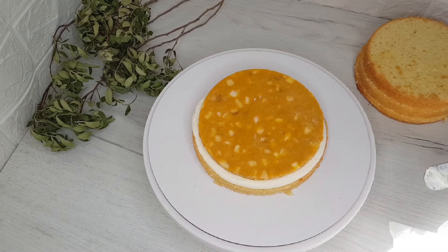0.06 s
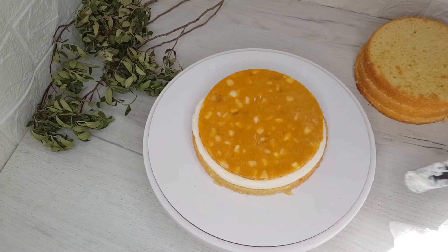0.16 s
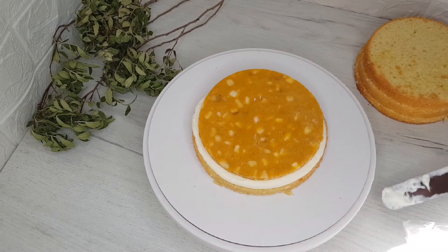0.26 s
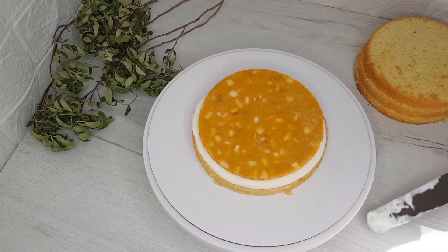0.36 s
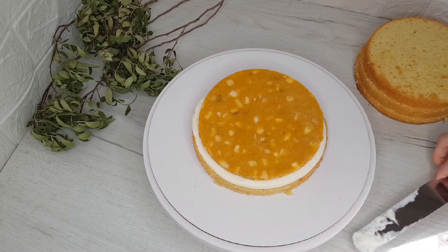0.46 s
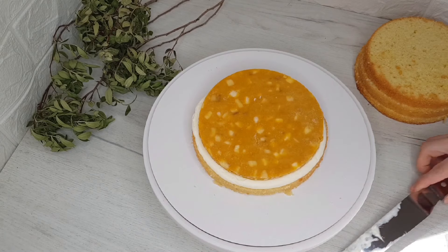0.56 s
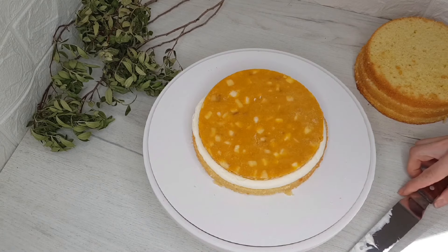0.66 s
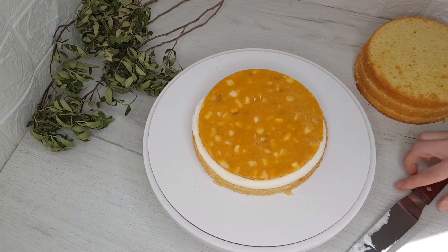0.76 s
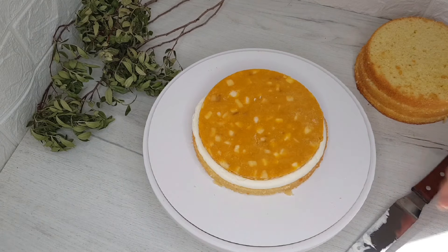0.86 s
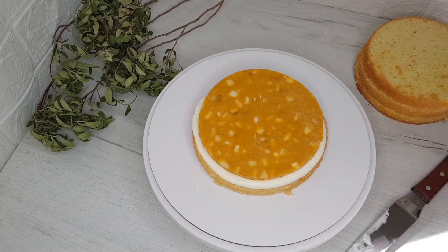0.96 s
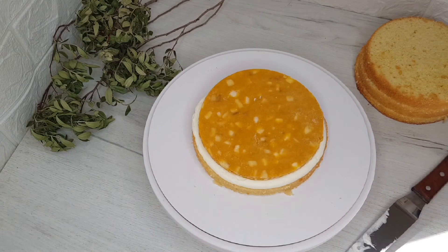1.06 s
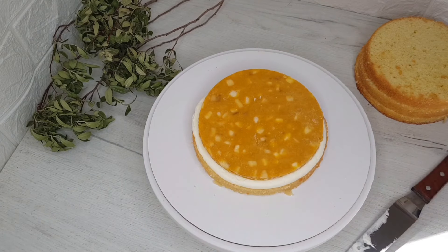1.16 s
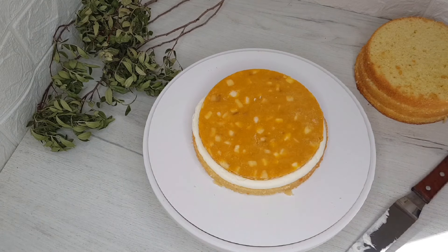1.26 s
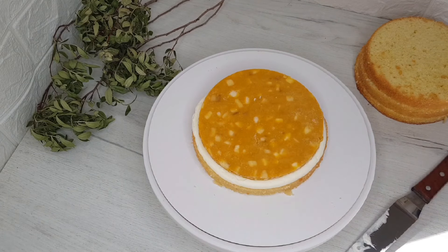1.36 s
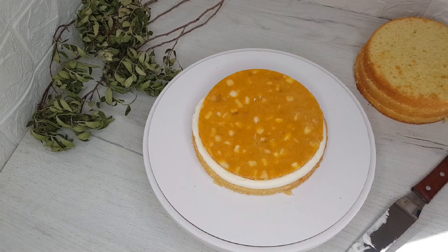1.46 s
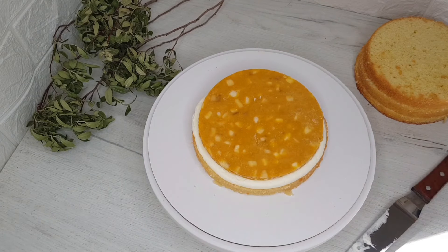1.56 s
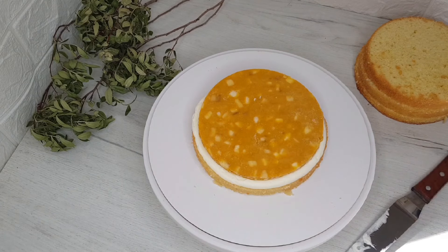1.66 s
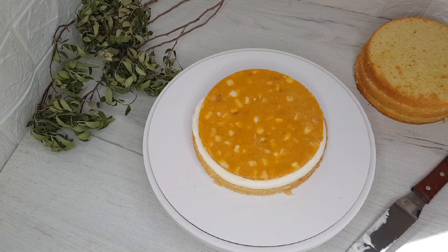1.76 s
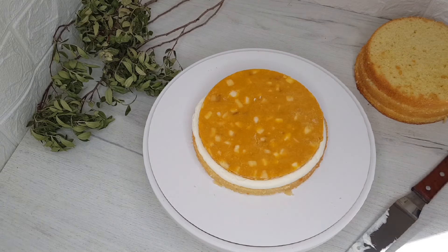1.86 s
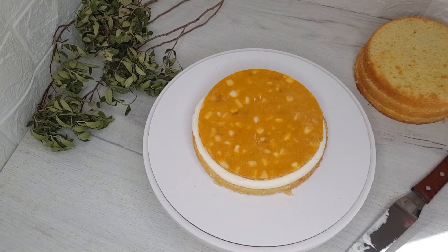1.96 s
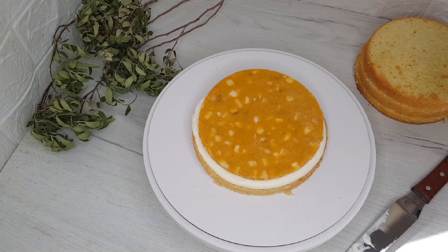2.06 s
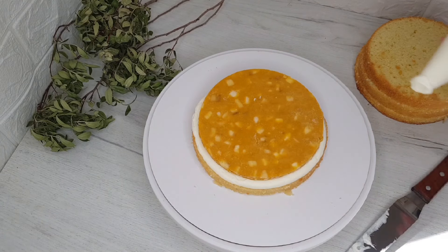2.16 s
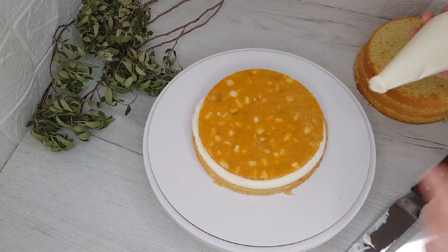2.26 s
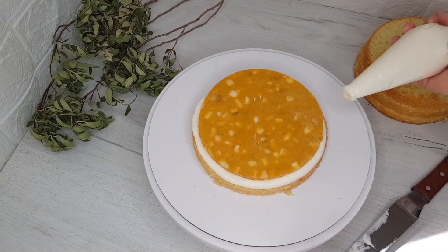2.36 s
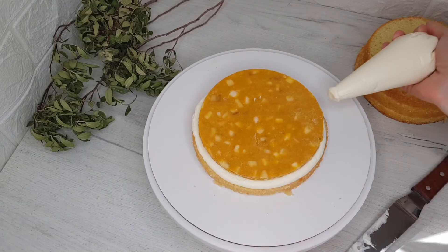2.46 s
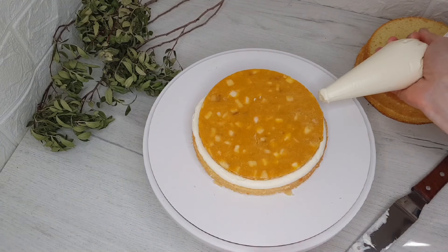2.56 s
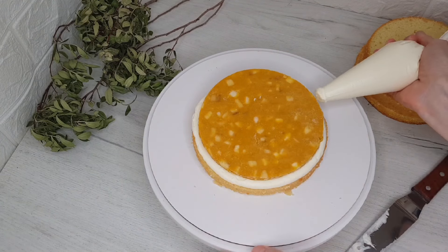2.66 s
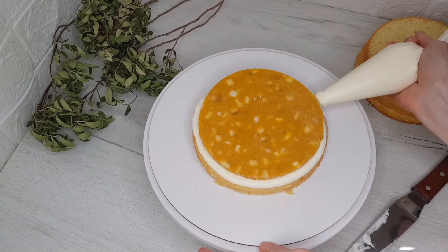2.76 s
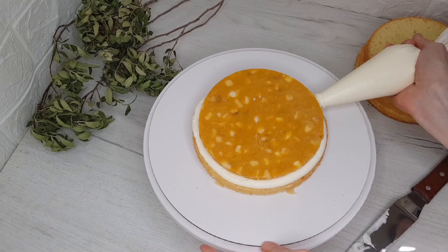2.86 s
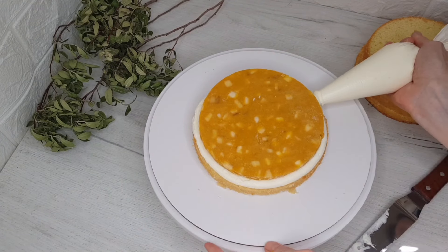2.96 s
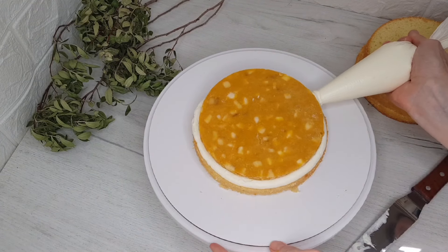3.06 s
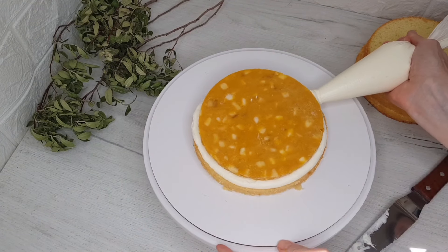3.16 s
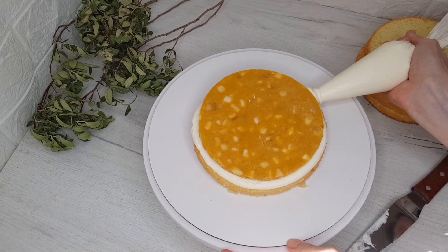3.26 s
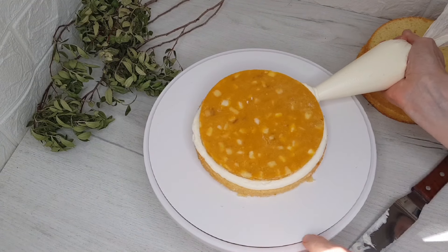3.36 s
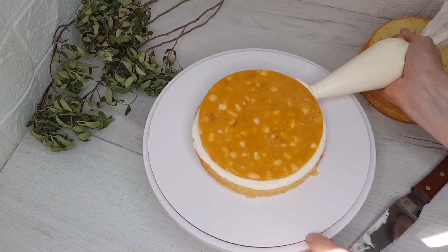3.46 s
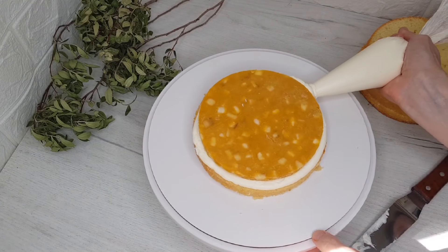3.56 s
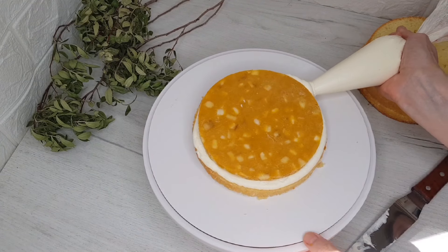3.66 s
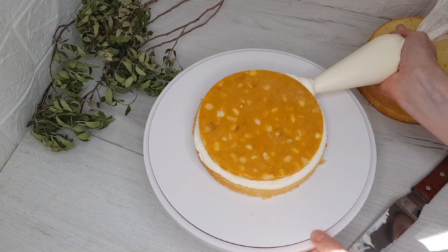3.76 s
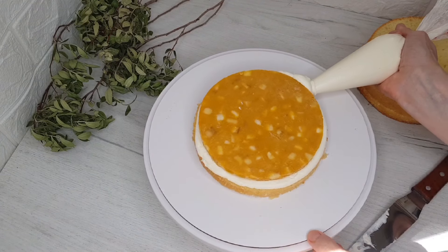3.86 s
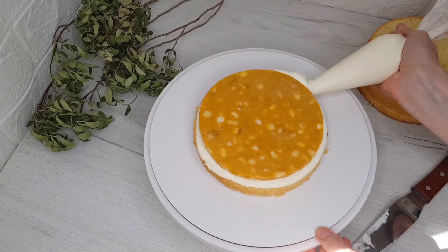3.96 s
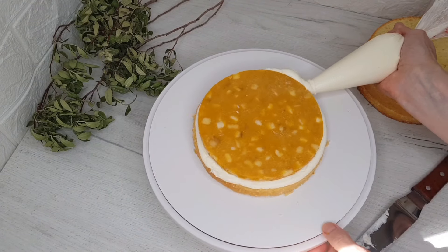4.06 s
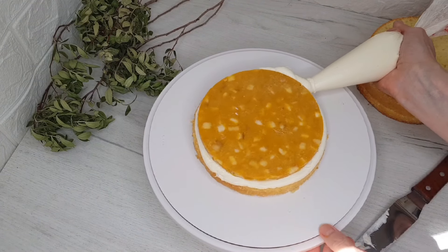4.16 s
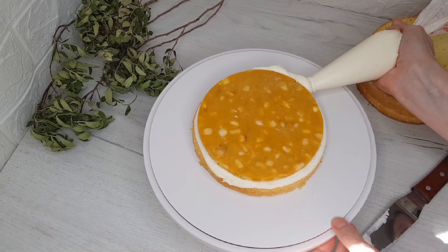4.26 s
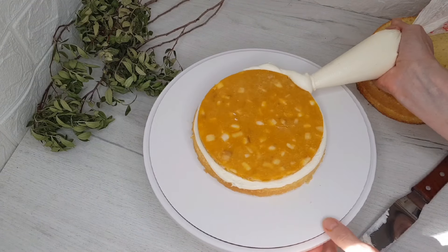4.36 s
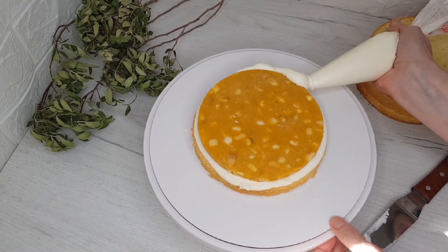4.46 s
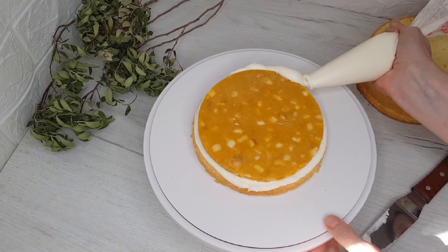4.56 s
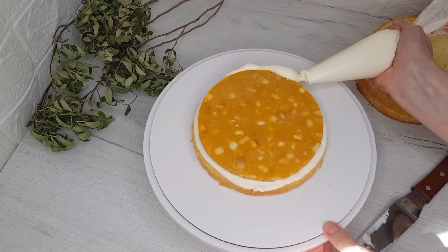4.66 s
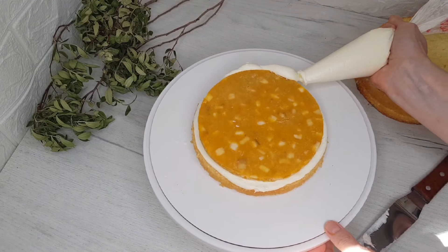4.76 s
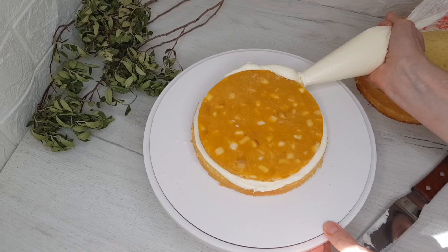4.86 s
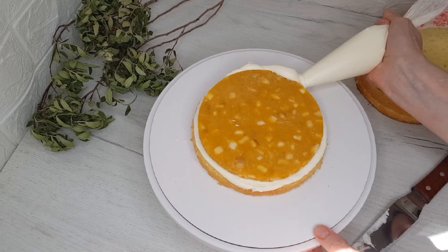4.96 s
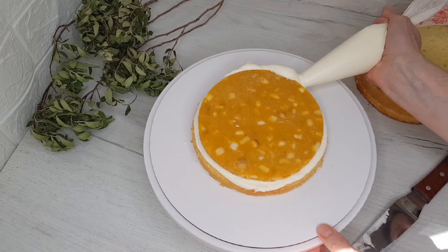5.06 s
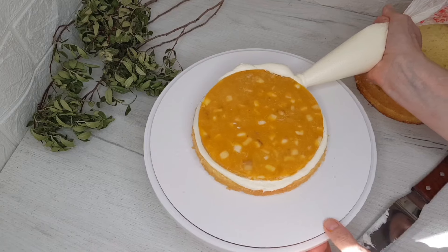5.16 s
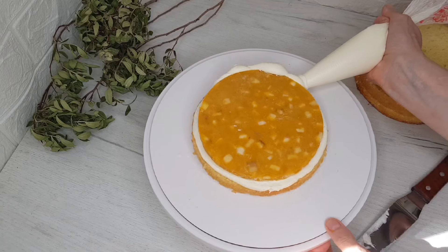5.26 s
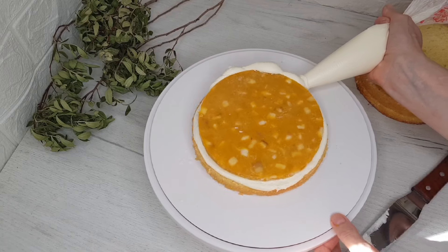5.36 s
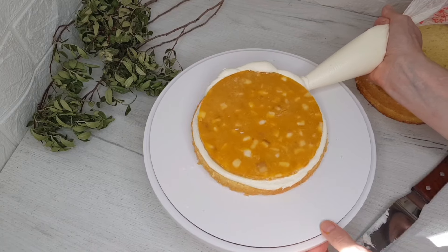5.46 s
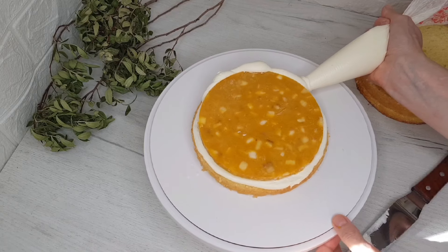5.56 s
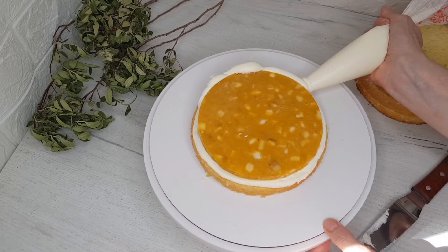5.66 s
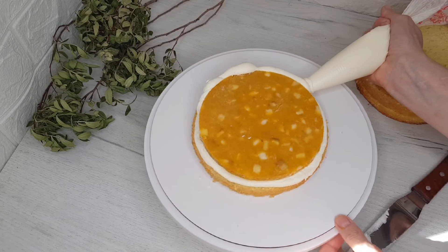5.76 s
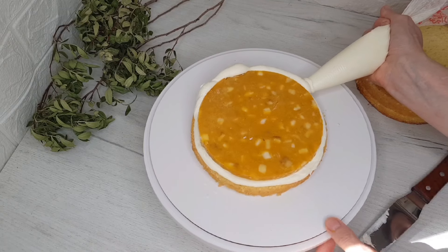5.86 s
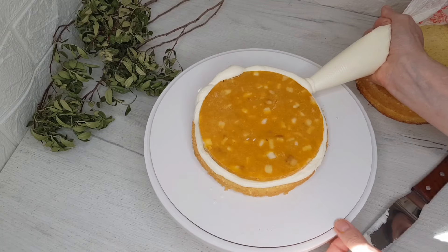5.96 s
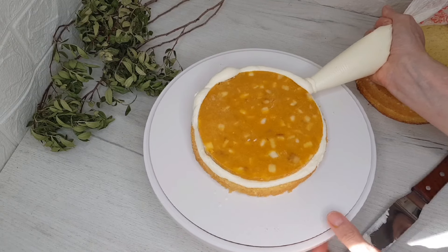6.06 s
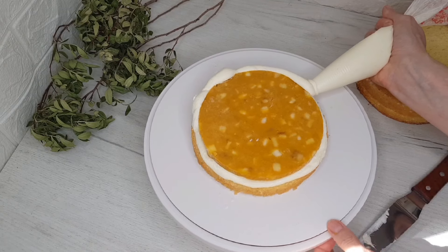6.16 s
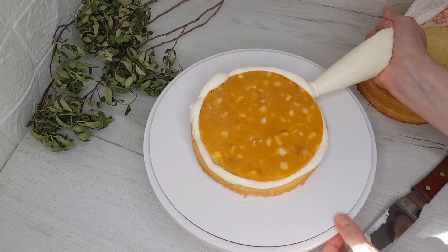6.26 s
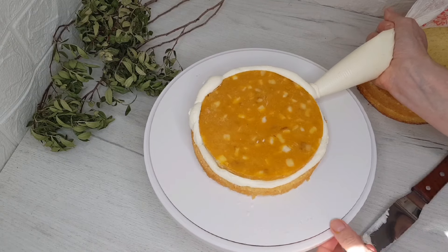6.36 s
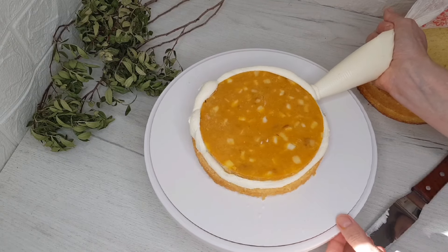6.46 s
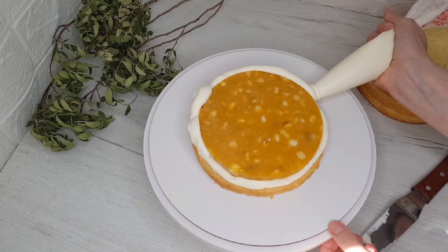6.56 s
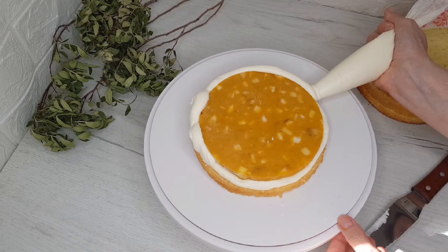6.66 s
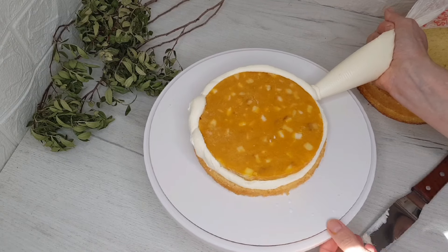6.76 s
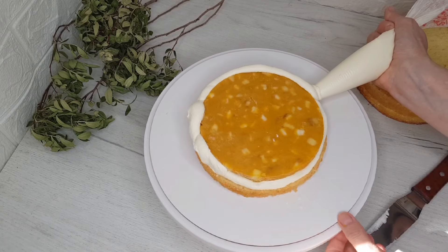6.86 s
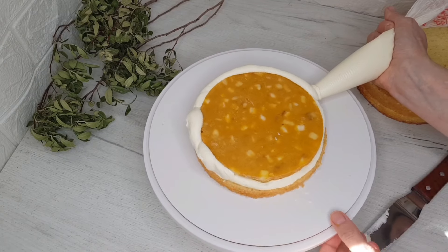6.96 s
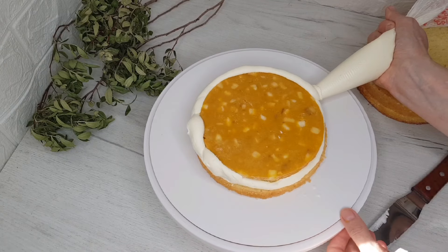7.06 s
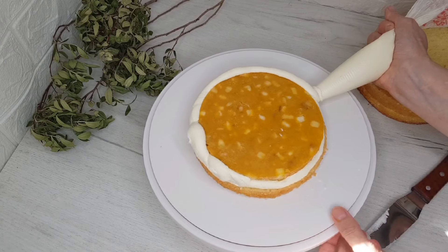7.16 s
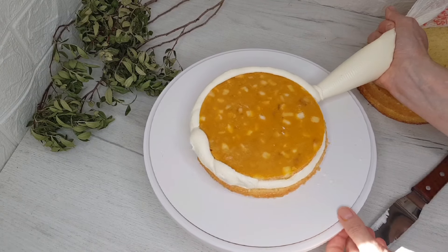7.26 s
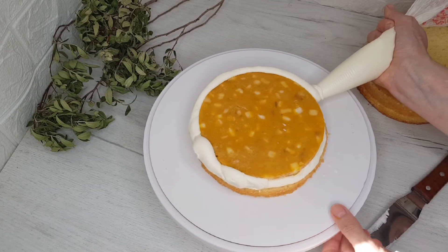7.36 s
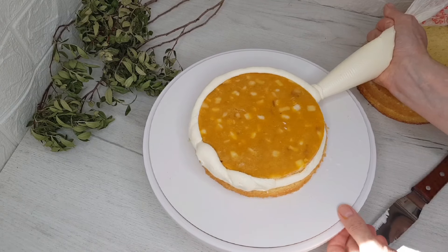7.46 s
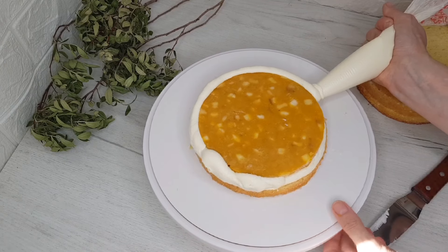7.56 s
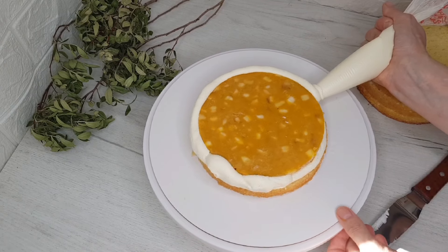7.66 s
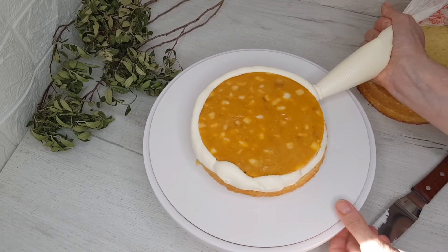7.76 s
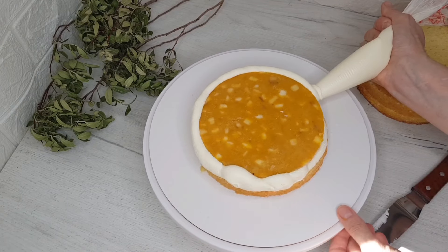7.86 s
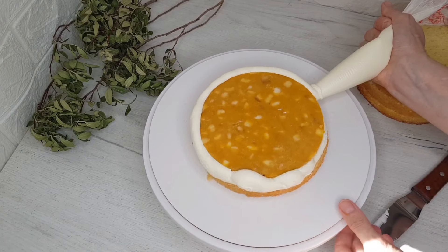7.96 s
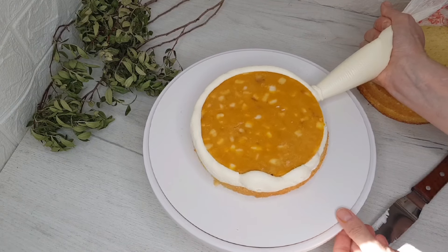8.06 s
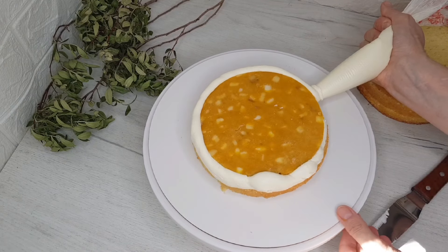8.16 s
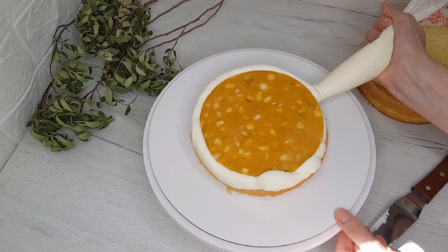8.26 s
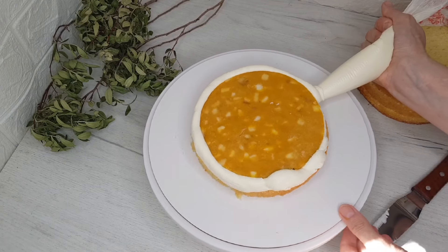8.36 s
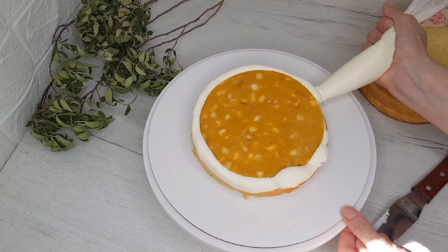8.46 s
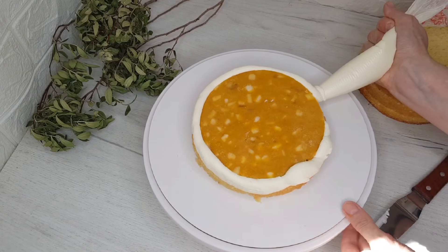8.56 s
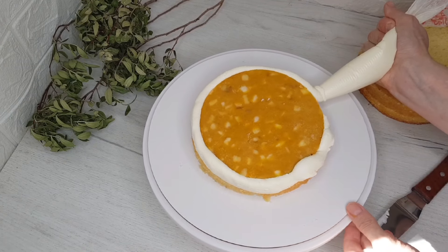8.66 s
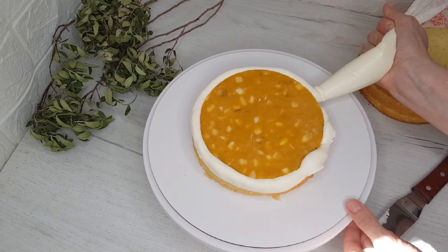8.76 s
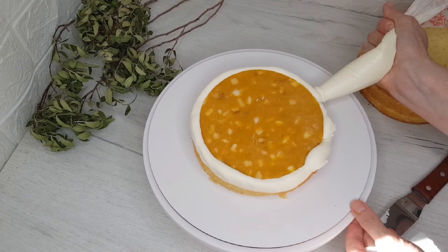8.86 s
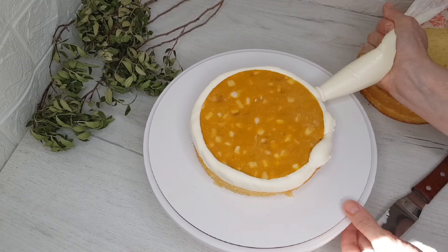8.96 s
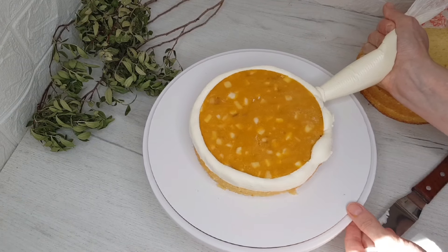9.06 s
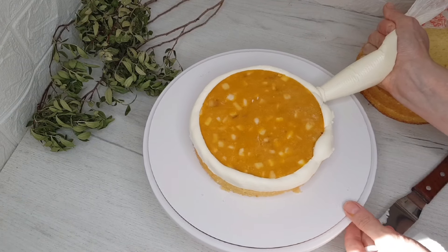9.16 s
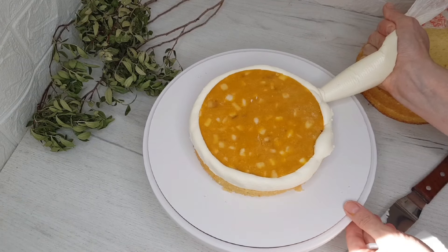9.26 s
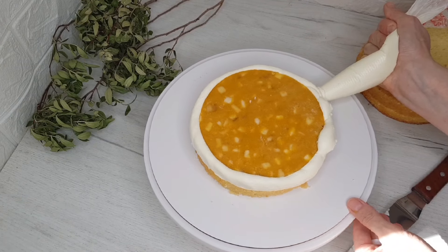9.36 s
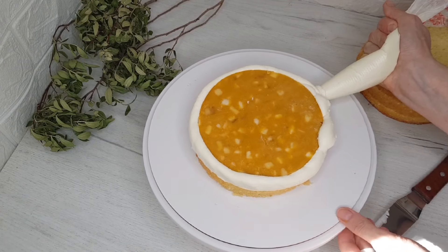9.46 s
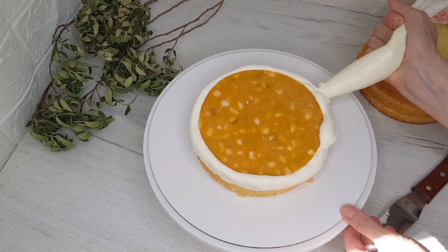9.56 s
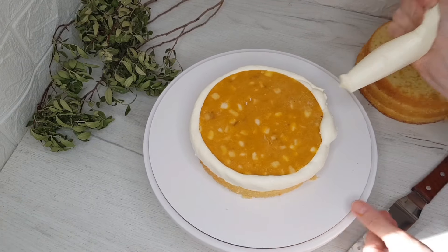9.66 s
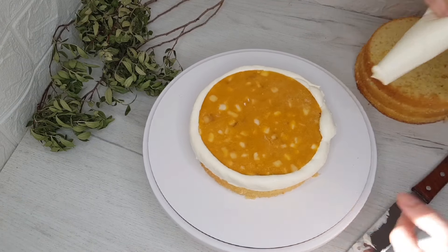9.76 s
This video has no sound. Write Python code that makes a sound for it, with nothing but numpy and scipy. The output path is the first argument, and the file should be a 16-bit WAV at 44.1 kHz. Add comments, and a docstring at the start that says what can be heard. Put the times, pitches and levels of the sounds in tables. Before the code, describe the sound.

A home kitchen, heard close to the table, with a short room ring and a steady, slightly wavering low fridge hum throughout. At the start there is a faint low rumble and a soft bump. From 0.8 s a steel palette knife touches down with light taps, then a hard bright clack at 0.92 s and a quick rattle dying by 1.05 s. From 1.15 to 2.3 s a plastic piping bag crackles densely and crisply, strongest around 1.5 s, thinning, then a last sharp snap at 2.23 s. Sparse faint ticks follow. From about 2.9 s a turntable is pushed round in soft rumbling nudges; a strong dull thud lands at 4.53 s. From 5.6 to 9 s low, woody, irregular knocks grow frequent, with tiny plastic creaks. It calms after 9 s, with a knock at 9.55 s and a fresh crackle from 9.75 s to the end.

```python
"""A plastic piping bag crackles as it is picked up from a kitchen table, where a palette knife is laid down;
then cream is piped round a cake on a turntable whose bearing rumbles through the table, which is knocked now
and then. A fridge and the mains hum; the room rings. Film: random buckling pulses, shaped noise and single
snaps. Knife and table: resonant modes driven by contact noise and pulses. Hum: wavering sine lines over shaped
noise. Room: decaying octave bands of noise."""
import sys
import numpy as np
from scipy import signal
from scipy.fft import rfft, irfft
from scipy.io import wavfile
from scipy.ndimage import uniform_filter1d

SR = 44100
rng = np.random.default_rng(int(sys.argv[2]) if len(sys.argv) > 2 else 0)


def transcribe(u):
    """Save the signal u as a 16-bit wav file named by the first command-line argument.

    u: samples, shape (n,) or (channels, n), limited to [-1, 1]; the rate is SR.
    q: integer samples, one column per channel.
    """
    v = np.clip(np.atleast_2d(u).T, -1, 1)
    q = np.round(v * 32767).astype(np.int16)
    wavfile.write(sys.argv[1], SR, q)


N = 432621
T = np.arange(N) / SR

# resonant modes of the table: f/Hz, bandwidth/Hz, level/dB
TABLE_MODES = [(79, 16, -5), (134.1, 8.7, 7), (202, 45, -6.5), (328.4, 49, 1), (451, 22, -2.5),
               (531.7, 16, -1.5), (610, 100, -9), (722.7, 52, 5.5), (867, 120, 2), (1200, 240, -4),
               (1380, 110, -10.5), (1800, 200, -21.5)]


def undb(db):
    """Amplitude ratio of a level: 20 dB per factor of ten."""
    return 10 ** (np.asarray(db) / 20)


def unit(x):
    """Normalisation by power: scaled to rms 1."""
    return x / np.sqrt(np.mean(x ** 2))


def peak(x):
    """Normalisation by amplitude: scaled to peak 1."""
    return x / np.abs(x).max()


def band(x, lo_hz, hi_hz):
    """Band-pass filtering: keeps the components between two frequencies."""
    sos = signal.butter(2, [lo_hz, hi_hz], "band", fs=SR, output="sos")
    return signal.sosfilt(sos, x)


def colour(x, points):
    """Spectral weighting through (f/Hz, level/dB) points, interpolated on log frequency."""
    hz, db = np.transpose(points)
    f = np.arange(len(x) // 2 + 1) * SR / len(x) + 1  # the 1 Hz avoids log(0)
    gain = undb(np.interp(np.log(f), np.log(hz), db))
    return irfft(rfft(x) * gain, len(x))


def curve(tables):
    """Amplitude envelope linear in dB through spans of (t/s, level/dB); silence between the spans."""
    out = np.zeros(N)
    for rows in map(np.array, tables):
        inside = (T >= rows[0, 0]) & (T <= rows[-1, 0])
        out[inside] = undb(np.interp(T[inside], rows[:, 0], rows[:, 1]))
    return out


def swells(rows, attack_s, fade_db_s):
    """Incoherent addition: each (t/s, hold/s, level/dB) row rises, holds and fades; powers add."""
    power = 0
    for s, hold, db in rows:
        rise = np.clip((T - s) / attack_s, 0, 1)
        fade_db = fade_db_s * np.clip(T - s - hold, 0, None)
        power = power + (rise * undb(db - fade_db)) ** 2
    return np.sqrt(power)


def walk(rate):
    """Low-pass random fluctuation with rms 1: held normal draws, rate per second, smoothed twice."""
    k = int(SR / rate)
    steps = np.repeat(rng.standard_normal(N // k + 1), k)
    return unit(uniform_filter1d(uniform_filter1d(steps, k), k)[:N])


def crackle(rate, spread_db):
    """Random pulse process, rate per second: many small pulses and few large, none huge."""
    chance, sign, size = rng.random((3, N))
    pulse_gain = undb(-spread_db * np.log(size + .025))
    return unit((chance < rate / SR) * np.sign(sign - .5) * pulse_gain)


def ring(x, hz, t60):
    """Damped resonance: one mode; a unit pulse starts a sine whose decay envelope has amplitude 1."""
    pole = np.exp(2j * np.pi * hz / SR - np.log(1000) / (t60 * SR))
    return signal.lfilter([1], [1, -pole], x).imag


def burst(decay_ms, size, rise_ms):
    """Transient noise: an exponential rise times an exponential decay."""
    ms = np.arange(size) / SR * 1000
    return rng.standard_normal(size) * np.exp(-ms / decay_ms) * (1 - np.exp(-ms / rise_ms))


def add(out, s, sound, peak_db):
    """Linear superposition: lays a short sound at a time, at a peak level."""
    i = int(s * SR)
    sound = sound[:N - i]
    out[i:i + len(sound)] += sound * undb(peak_db) / np.abs(sound).max()


def fridge():
    """Tonal and broadband noise: motor and mains lines waver in level and frequency over the room's steady air."""
    # motor and mains lines: f/Hz, rms level/dB, waver/dB
    lines = [(48.5, -60.5, 1), (97.8, -52.5, 1.5), (99, -58, 2), (246, -75.5, 5), (300.7, -73, 7),
             (300.8, -66.5, 1)]
    # spectrum of the air noise: f/Hz, relative level per Hz/dB
    air_spectrum = [(18, -47), (30, -15.5), (81, -4.5), (102, -5.5), (173, -19), (307, -18.5), (350, -27),
                    (467, -24), (673, -36.5), (1100, -45.5), (2300, -47.5), (4300, -47.5), (5500, -41.5),
                    (9700, -43.5), (15500, -58.5)]
    air_db = -56  # rms
    hum = 0
    for hz, db, waver_db in lines:
        gain = np.sqrt(2) * undb(db + waver_db * walk(2.377))
        wavering_hz = hz + 0.005 * hz * walk(6.9)
        hum = hum + gain * np.sin(2 * np.pi * np.cumsum(wavering_hz) / SR)
    return hum + undb(air_db) * unit(colour(rng.standard_normal(N), air_spectrum))


def board(pushes, luck_db, detune):
    """Modal superposition: deep, middle and upper table modes, each group driven by its own push."""
    groups = np.zeros_like(pushes)
    for k, (hz, width, db) in enumerate(TABLE_MODES):
        group = np.searchsorted([230, 650], hz)  # group limits in Hz
        t60 = np.log(1000) / np.pi / width
        gain = (-1) ** k * undb(db + luck_db[k]) * width
        groups[group] += gain * ring(pushes[group], hz * (1 + detune[k]), t60)
    return groups


def turntable():
    """Structure-borne excitation: bearing balls tumble unevenly, and the table is knocked now and then; the
    table sounds both."""
    # fingers push the plate round and it coasts: t/s, hold/s, deep-mode level/dB, brightness (more for higher modes)/dB
    finger_pushes = [(0.0, 0.0074, -48.5, -7.5), (0.2, 0.15, -56.5, -1), (2.917, 0.069, -59, 0),
                     (3.411, 0.071, -53.5, 0.5), (3.503, 0.052, -51.5, 3), (3.67, 0.1, -53.5, -1.5),
                     (3.897, 0.17, -61.5, 8), (4.128, 0.2, -53.5, 3), (4.398, 0.086, -52.5, 3.5),
                     (4.702, 0.051, -56, 3.5), (5.076, 0.049, -66.5, 10.5), (5.217, 0.22, -61, 5.5),
                     (5.591, 0.053, -50.5, 4), (5.695, 0.069, -49.5, -0.5), (5.827, 0.031, -51, -13),
                     (5.925, 0.17, -48.5, 1.5), (6.346, 0.14, -50.5, 0.5), (6.6, 0.2, -56.5, 6.5),
                     (6.888, 0.28, -55, 6), (7.277, 0.057, -48.5, 3), (7.483, 0.25, -54.5, 8),
                     (7.782, 0.52, -51, 3), (8.478, 0.11, -47, -2), (8.672, 0.14, -48, 4),
                     (8.853, 0.13, -46.5, -0.5), (9.168, 0.028, -61, -16.5), (9.501, 0.11, -53.5, -2),
                     (9.767, .05, -50, 13)]
    # knocks through the table; where each lands sets the mix:
    # t/s, peak level/dB, middle modes against the deep/dB, upper modes against the deep/dB
    knocks = [(0.235, -39.5, -3, -36), (0.924, -30.5, 0, 8), (1.289, -30, 8.5, 0), (1.468, -34, -6, 16),
              (2.23, -33.5, 19, 0), (2.933, -36, 3, 2.5), (3.412, -43, -3.5, -6), (3.583, -34.5, -6, -8),
              (3.903, -33, 1, -3), (4.145, -34, -4, -5), (4.244, -34, -10, -10), (4.344, -47, -17, -11),
              (4.529, -16, 3, -11), (4.547, -32, 8, -17), (4.561, -29, 5, -17), (4.61, -33, 2.5, 4.5),
              (5.085, -47, 14, -1), (5.614, -36.5, 6, 1), (5.715, -36.5, 7.5, 2.5), (5.85, -35, -21, -14),
              (5.926, -30, 3, -3), (5.979, -31, 13, 13.5), (6.152, -37, -3, 3), (6.309, -40.5, -23, -28),
              (6.341, -43.5, 20, -6), (6.355, -44, 0, 4), (6.375, -34.5, 7.5, 3), (6.403, -38, 9, 8.5),
              (6.46, -33, -1, -2), (6.603, -35, 8, 5.5), (6.711, -33.5, -2, -3.5), (6.805, -38, 4, -1),
              (6.897, -35.5, 3, -0.5), (6.949, -38, -16, -18), (7.044, -35, 11, 16),
              (7.092, -31.5, 2, -6.5), (7.306, -32.5, 5.5, -1.5), (7.401, -39.5, -2, 10.5),
              (7.478, -36.5, 3.5, -8), (7.517, -49, 13, 10), (7.576, -36.5, 5, 7), (7.661, -33, 3, 6),
              (7.799, -30, -3.5, -4.5), (7.88, -31.5, 10, 4), (8.016, -35, 1.5, 9), (8.106, -33, 8, -3),
              (8.128, -39, 7, 6), (8.177, -30.5, -12, -7.5), (8.208, -30, -2, -18), (8.27, -32.5, -4.5, -4),
              (8.322, -32.5, 2, -3), (8.478, -33, 5, 7), (8.507, -35, 8, 8), (8.53, -35, -10, -14),
              (8.579, -26.5, -5.5, -8), (8.673, -43, 2, -1), (8.7, -45, -6, 6), (8.733, -30, 6, 1),
              (8.785, -33, 1, -5), (8.875, -31.5, -1.5, -5.5), (8.953, -28, -2.5, -11),
              (9.276, -54, 4.5, -2.5), (9.556, -30.5, 2, -1), (9.772, -42.5, 3, -3)]
    attack_s, coast_db_s = 0.0042, 82.5
    # deep, middle, upper: (level against the deep/dB, dB per dB of brightness)
    shares = [(0, 0), (-9, 1), (-12, 1.17)]

    even = np.zeros(len(TABLE_MODES))
    # rolling balls press softly: each contact lasts about half a millisecond
    contacts = uniform_filter1d(crackle(220, 3.65), size=28)
    balls = np.tile(contacts * undb(5.1 * np.tanh(walk(22))), (3, 1))
    balls /= np.std(board(balls, even, even), axis=1, keepdims=True)
    gains = []
    for share_db, slope in shares:
        rows = [(s, hold, db + share_db + slope * bright_db) for s, hold, db, bright_db in finger_pushes]
        gains.append(swells(rows, attack_s, coast_db_s))
    out = board(balls * np.array(gains), even, even).sum(axis=0)

    for s, db, middle_db, upper_db in knocks:
        # where the knock lands favours and shifts some modes; the last draw sets the jostling time
        luck = rng.standard_normal((2, len(TABLE_MODES) + 1))
        jostle_ms = 5.6 * np.exp(0.46 * luck[0, -1])
        # the parts jostle around one round push of about half a millisecond; hard knocks are mostly push
        jostle = undb(-3.5 - 0.31 * (db + 32.5)) * burst(jostle_ms, size=16000, rise_ms=1.6)
        push = np.pad(np.hanning(26), (130, len(jostle) - 156))
        blow = np.tile(jostle + push, (3, 1))
        deep, middle, upper = map(peak, board(blow, 2.0 * luck[0], 0.034 * luck[1]))
        add(out, s, deep + undb(middle_db) * middle + undb(upper_db) * upper, db)
    return out


def crumpling():
    """Buckling instability: dense tiny bunched buckles, closer together the harder the film is crumpled."""
    # the film is crumpled as the bag is lifted and put away; per span: t/s, level of the bright part/dB
    spans = [
        [(1.125, -72), (1.142, -51.5), (1.21, -49.5), (1.218, -32), (1.245, -37), (1.29, -33.5), (1.34, -43.5),
         (1.405, -44.5), (1.42, -28.5), (1.46, -31), (1.475, -25.5), (1.512, -29), (1.535, -35), (1.585, -37),
         (1.6, -34.5), (1.76, -47), (1.87, -41.5), (1.95, -47.5), (2.09, -49.5), (2.11, -47), (2.143, -42.5),
         (2.158, -31), (2.2, -32.5), (2.217, -28.5), (2.232, -34), (2.255, -38.5), (2.31, -53), (2.4, -86.5)],
        [(9.72, -81), (9.774, -44.5), (9.81, -37)],
    ]
    # large to small facets of film, each ticking in its own range: lower f/Hz, upper f/Hz
    facet_ranges = [(50, 2600), (2200, 4500), (4000, 7500), (6500, 18000)]
    # spectrum of the bright part: f/Hz, relative level per Hz/dB
    film_spectrum = [(710, -47), (1200, -30), (1760, 3), (2070, 2.5), (2330, 1), (6510, 1.5), (10700, -5),
                     (15500, -20.5)]
    buckles_per_s = 9000  # shared by all facets, at the hardest crumpling
    # dull part against the bright part at the loudest; dB more per dB of level
    dull_db, dull_growth = -8, 0.11

    force = curve(spans)
    rate = np.clip(buckles_per_s * peak(force) ** 0.45, 400, 20000)
    together = crackle(rate, 3.0)
    buckles = 0
    for lo_hz, hi_hz in facet_ranges:
        alone = crackle(rate / 4, 3.0) * undb(3.6 * np.tanh(walk(90)))
        buckles = buckles + band(together + 1.4 * alone, lo_hz, hi_hz)
    buckles = buckles * undb(4.1 * np.tanh(walk(75))) / np.sqrt(rate)  # even power at every rate
    bright = unit(colour(buckles, film_spectrum))
    dull = unit(band(buckles, 300., 1600.0)) + undb(-8.5) * unit(band(buckles, 60., 580.0))
    return force * (bright + undb(dull_db) * peak(force) ** dull_growth * dull)


def creeping():
    """Stick-slip friction: the hand shifts its grip and the film creeps in small random slips."""
    # grips: t/s, hold/s, level/dB, part near 1.5 kHz against the rest/dB
    grips = [(0.212, 0.046, -69, -1.5), (0.266, 0.044, -69.5, -2.5), (0.42, 0.044, -69, -3),
             (2.43, 0.059, -64, -11), (2.85, 0.15, -72, -4), (3.5, 0.12, -74.5, 0.5), (3.93, 0.29, -67, -1),
             (4.325, 0.065, -67.5, -1), (4.76, 0.017, -59.5, -2.5), (4.986, 0.098, -72, -8),
             (5.087, 0.23, -68, -10), (5.921, 0.064, -62, -1), (6.37, 0.039, -71.5, 2),
             (6.6, 0.27, -82.5, -1.5), (7.04, 0.047, -72, -7.5), (7.58, 0.065, -72, 4),
             (7.805, 0.037, -71, 0), (8.014, 0.045, -68.5, 0), (8.204, 0.044, -70, -5),
             (8.48, 0.12, -72.5, -7), (8.67, 0.2, -78.5, 2.5), (9.547, 0.16, -71.5, -4.5)]
    attack_s, fade_db_s = 0.0045, 88.5
    slips = crackle(2800, 5.8) * undb(4.0 * np.tanh(walk(35)))
    creep = unit(band(band(slips, 1400.0, 7100.0), 1520.0, 9300.0))
    dull = unit(band(slips, 1100.0, 2300.0))
    creep_gain = swells([(s, hold, db) for s, hold, db, _ in grips], attack_s, fade_db_s)
    dull_gain = swells([(s, hold, db + dull_db) for s, hold, db, dull_db in grips], attack_s, fade_db_s)
    return creep_gain * creep + dull_gain * dull


def bag():
    """Impulsive radiation of thin film: crumpling and creep, while the loud creases snap one by one."""
    # single creases snapping and, from 6 s on, low clicks rattling with the table knocks: t/s, peak level/dB,
    # pitch f/Hz
    clicks = [(0.209, -54.5, 3980), (0.291, -47, 4700), (1.147, -36.5, 1800), (1.169, -26, 4200),
              (1.206, -31, 2120), (1.2172, -28, 5810), (1.2289, -20.5, 6030), (1.263, -28, 3150),
              (1.287, -21.5, 2800), (1.322, -20, 5000), (1.3298, -20.5, 2400), (1.352, -27, 6400),
              (1.379, -41, 4900), (1.39, -23, 3570), (1.4145, -22, 3900), (1.4356, -40, 5500),
              (1.45, -36, 3000), (1.4691, -20, 3580), (1.489, -18, 5000), (1.497, -21, 5370),
              (1.508, -15, 5440), (1.5978, -18.5, 3700), (1.625, -26, 2960), (1.657, -19.5, 5000),
              (1.7132, -25.5, 4830), (1.736, -26.5, 8100), (1.759, -34, 5500), (1.783, -25.5, 3950),
              (1.818, -29, 5000), (1.8502, -26.5, 4400), (1.887, -39, 2500), (1.9, -32, 2000),
              (1.923, -28.5, 5990), (1.942, -34, 4500), (1.962, -33, 6040), (1.978, -36, 6500),
              (2.0012, -28, 7450), (2.016, -41, 3030), (2.027, -33, 3900), (2.0986, -29, 5060),
              (2.1071, -26, 2440), (2.229, -15, 4830), (2.437, -42.5, 3470), (2.465, -43.5, 5040),
              (2.5, -42, 4150), (2.5552, -46, 2780), (2.602, -36, 5500), (2.71, -46.5, 2720),
              (2.839, -40.5, 5440), (2.93, -51, 4600), (2.9956, -49, 5050), (3.036, -32.5, 6000),
              (3.1068, -46, 4550), (3.555, -53, 5260), (3.797, -50, 6430), (3.906, -43, 6460),
              (3.9875, -41.5, 5040), (4.025, -51, 3900), (4.071, -50.5, 3930), (4.0876, -47, 3530),
              (4.1212, -48.5, 3000), (4.234, -53, 3500), (4.3212, -37, 3970), (4.439, -53, 4840),
              (4.533, -35.5, 1580), (4.536, -28.5, 7000), (4.552, -35.5, 1910), (5.051, -56.5, 5410),
              (5.086, -42, 5530), (5.106, -52, 3530), (5.138, -38, 4300), (5.156, -56, 3700),
              (5.2114, -42.5, 5100), (5.219, -47, 2200), (5.226, -52, 4020), (5.233, -51, 2300),
              (5.255, -47, 2420), (5.3062, -51, 3250), (5.325, -40, 6040), (5.374, -43, 3970),
              (5.5832, -49.5, 6520), (5.7281, -39.5, 6020), (5.93, -48.5, 2240), (5.964, -40.5, 2310),
              (6.019, -46, 2180), (6.1969, -53, 3890), (6.396, -43, 1700), (6.62, -61, 1700),
              (6.895, -56.5, 3070), (6.9405, -51, 6000), (6.983, -54, 1390), (7.0518, -45.5, 1310),
              (7.092, -47, 2780), (7.2264, -50, 8870), (7.4004, -48, 1360), (7.523, -54, 1520),
              (7.5823, -41.5, 1540), (7.806, -45.5, 1610), (7.9955, -49.5, 1290), (8.02, -40.5, 1478),
              (8.214, -39.5, 1310), (8.483, -43.5, 1255), (8.532, -47, 1930), (8.5776, -49, 1800),
              (8.801, -57, 2090), (8.8798, -53, 2020), (9.702, -55.5, 4850), (9.755, -38, 5330),
              (9.772, -35.5, 2530)]
    dull_db, treble_db = -10.5, -5  # parts near 1 kHz and above 3 kHz against the sharp part
    out = crumpling() + creeping()
    for s, db, hz in clicks:
        # the crease flips in a few ms, then the film around it settles in smaller ticks
        ticks = np.repeat(undb(6.8 * rng.standard_normal(75)), 80)
        flip = burst(3.0, size=6000, rise_ms=0.11)
        snap = flip + undb(-10.0) * ticks * burst(13.0, size=6000, rise_ms=3.3)
        snap[0] += 3.0
        snap = band(snap, 560.0, 11000.0)
        sharp = band(snap, hz / 1.8, min(hz * 1.6, 15000))
        sharp = band(sharp, hz / 5.4, min(hz * 2.6, 12000))
        dull = peak(band(snap, 680.0, 1900.0))
        treble = peak(band(snap, 4000.0, 9000.))
        add(out, s, peak(sharp) + undb(dull_db) * dull + undb(treble_db) * treble, db)
    return out


def knife():
    """Impact excitation: each tap is a crack; the blade chatters briefly and its steel modes ring on."""
    # blade and handle meet the table: t/s, peak level/dB, chatter time/ms, ringing brightness/(dB per octave)
    taps = [(0.794, -23.5, 15, -1), (0.877, -24, 16, 0), (0.924, -10, 2.3, 0), (0.933, -20.5, 11, 0),
            (0.945, -20, 2.3, -7.5), (0.965, -20.5, 2.3, -1.5), (0.972, -24, 2.3, 0), (0.978, -19, 3, -6.5),
            (1.033, -29, 3.3, -19.5)]
    # modes of the steel: f/Hz, level/dB, t60/s
    steel_modes = [(721, -10.5, 0.09), (823, -8.5, .07), (858, -7.5, 0.07), (1445, -12.5, 0.082),
                   (1675, -12, 0.07), (1770, -4.5, 0.045), (2370, -10.5, 0.07), (2670, -10, 0.07),
                   (2803, -6, 0.065), (3436, -7, 0.11), (3748, -9.5, 0.074), (4000, -6.5, 0.045),
                   (4400, -6, 0.021), (4894, -7, 0.05), (5170, -3.5, 0.036), (5530, -9.5, 0.072),
                   (6040, -8.5, 0.1), (6670, -10, .06), (7360, -11.5, .06)]
    choked_s = 0.0076  # t60 of the blade during contact
    out = np.zeros(N)
    ms = np.arange(SR // 2) / SR * 1000
    for s, db, chatter_ms, bright_db in taps:
        chatter = rng.standard_normal(len(ms)) * np.exp(-(ms / max(chatter_ms, .1)) ** 2)
        push = (ms == 0) + 0.3 * chatter  # hard contact reaches every mode
        # the bent blade splits each mode into a close pair, a little different at every tap
        luck = rng.standard_normal((2 * len(steel_modes), 2))
        steel = 0
        for (hz, mode_db, t60), (level_luck, pitch_luck) in zip(2 * steel_modes, luck):
            gain = undb(mode_db + 2.0 * level_luck + bright_db * np.log2(hz / 2000))
            steel = steel + gain * ring(push, hz * (1 + 0.02 * pitch_luck), t60)
        # while the blade is pressed down the same modes are choked
        choked = sum(undb(mode_db) * ring(push, hz, choked_s) for hz, mode_db, _ in steel_modes)
        crack = choked + undb(3.5) * band(chatter, 1500.0, 7000.)
        add(out, s, undb(-0.5) * peak(steel) + peak(band(crack, 1200.0, 8900.0)), db)
    return out


def room(x):
    """Diffuse reverberation: octave bands of noise, each decaying exponentially at its own rate."""
    # reverberation time: f/Hz, t60/s
    decay_times = [(150, 0.51), (700, 0.4), (1800, 0.43), (5000, 0.35), (12000, 0.24)]
    t, (hz, t60) = T[:SR], np.transpose(decay_times)
    tail = 0
    for low_hz in 60 * 2. ** np.arange(8):
        decay = np.interp(np.log(1.5 * low_hz), np.log(hz), t60)
        tail = tail + band(rng.standard_normal(SR), low_hz, 2 * low_hz) * 1000 ** (-t / decay)
    tail = tail * (1 - np.exp(-t / 0.004))  # the reflections build up
    return signal.fftconvolve(x, tail / np.sqrt(np.sum(tail ** 2)))[:N]


def scene():
    """Direct and reverberant fields plus hum; hands and things move, so the reflections keep changing."""
    hum, plate, film, steel = fridge(), turntable(), bag(), knife()
    # four room tails share the sound by drifting, signed gains of constant total power
    places = np.array([walk(9.0) for _ in range(4)])
    places /= np.sqrt(np.sum(places ** 2, axis=0))
    sent = undb(-5.5) * steel + undb(-8.0) * plate + undb(-6.0) * film
    wet = sum(room(sent * share) for share in places)
    return (steel + film + plate + wet + hum)[None]


def record(dry):
    """Band limitation: the microphone loses the deep bass; the top is cut."""
    bass_cut = signal.butter(6, 40., "high", fs=SR, output="sos")
    top_cut = signal.ellip(10, .2, 70, 15550, fs=SR, output="sos")  # ripple/dB, stop-band loss/dB, f/Hz
    return signal.sosfilt(top_cut, signal.sosfilt(bass_cut, dry))


dry = scene()
out = record(dry)
transcribe(out)
```